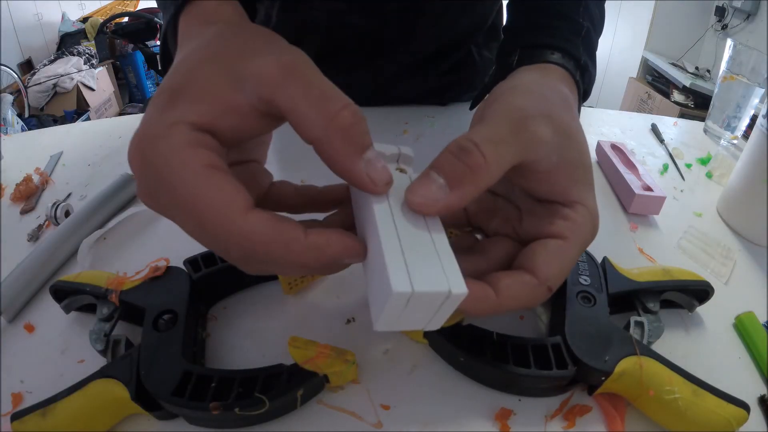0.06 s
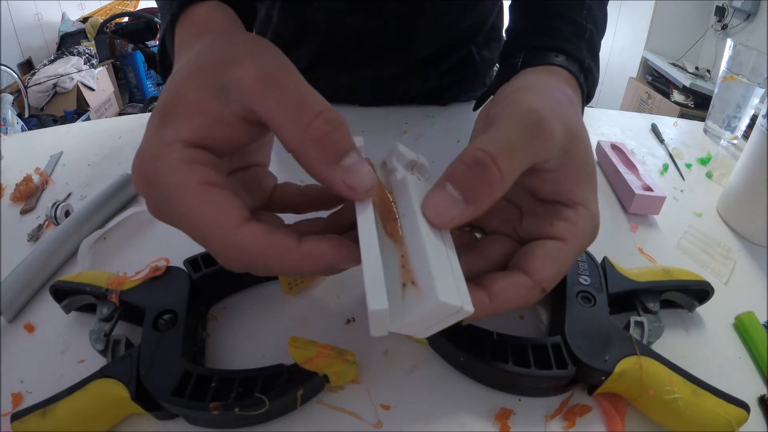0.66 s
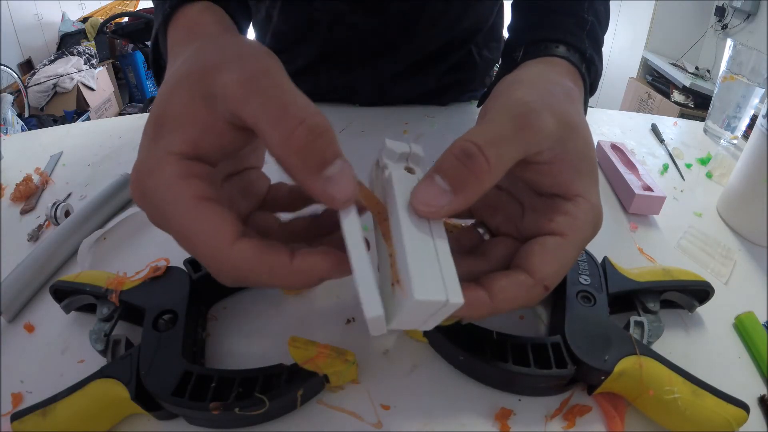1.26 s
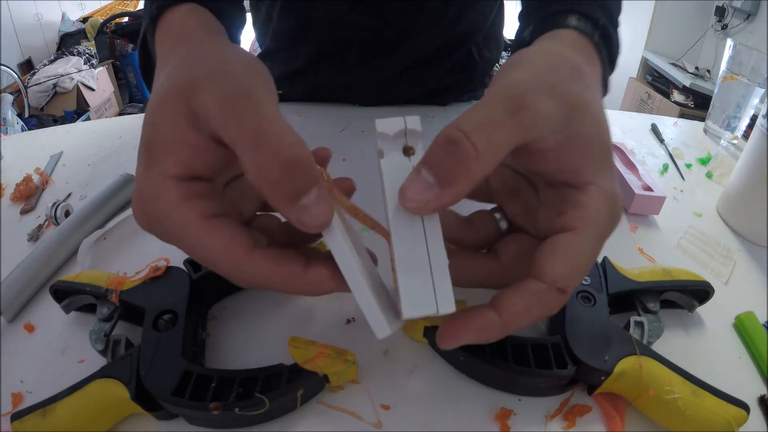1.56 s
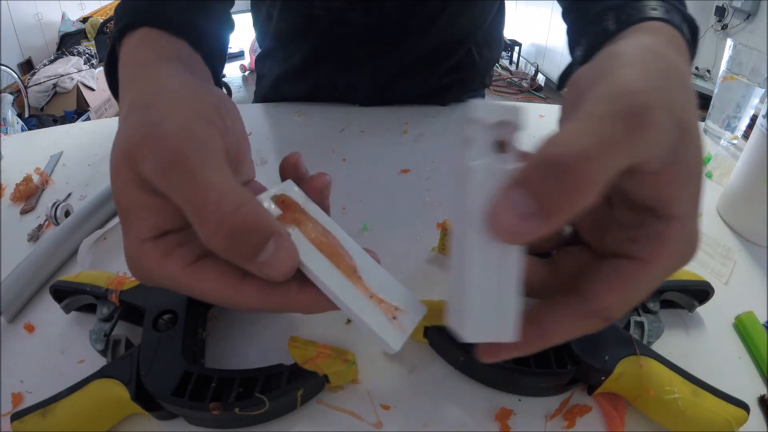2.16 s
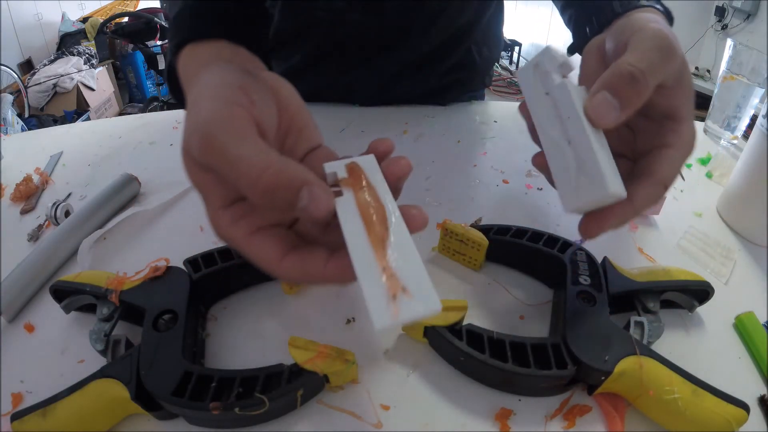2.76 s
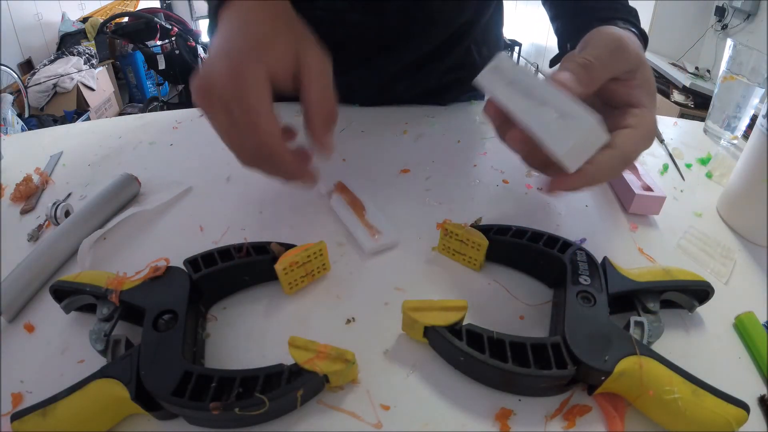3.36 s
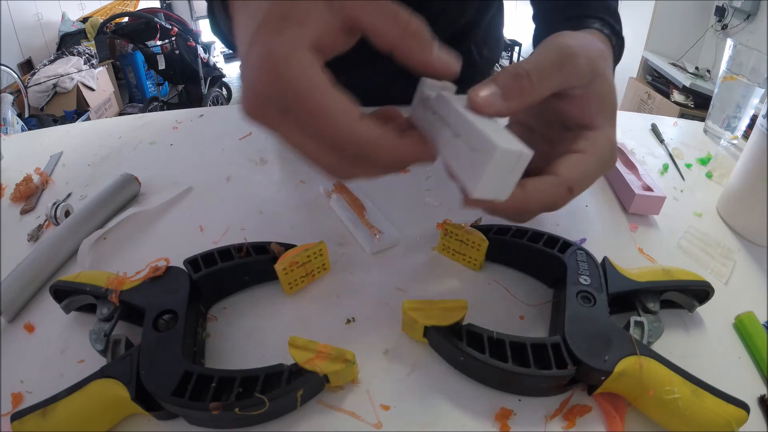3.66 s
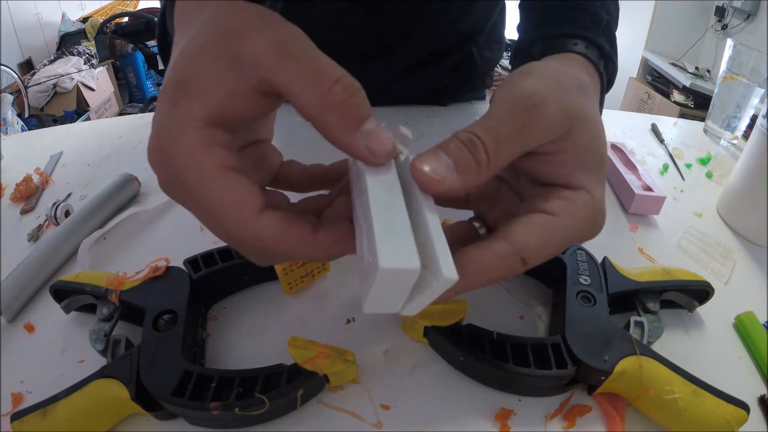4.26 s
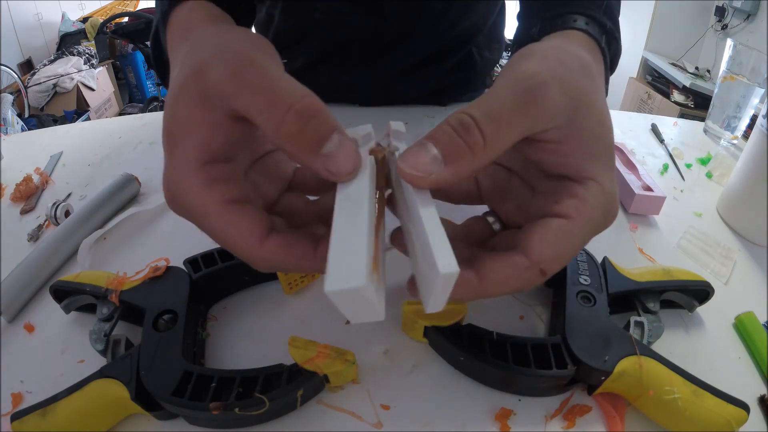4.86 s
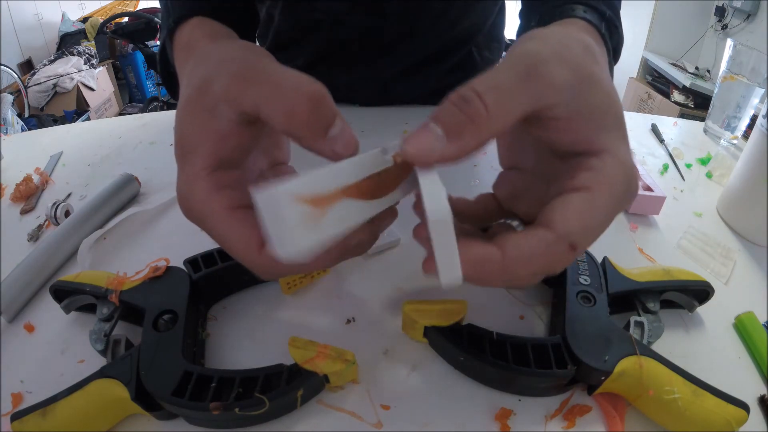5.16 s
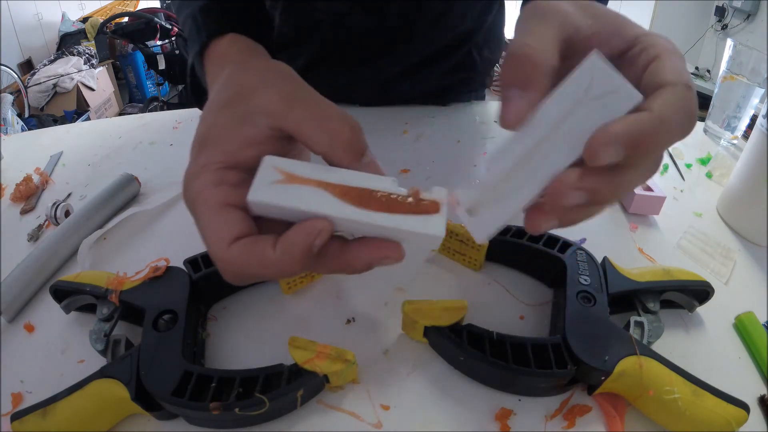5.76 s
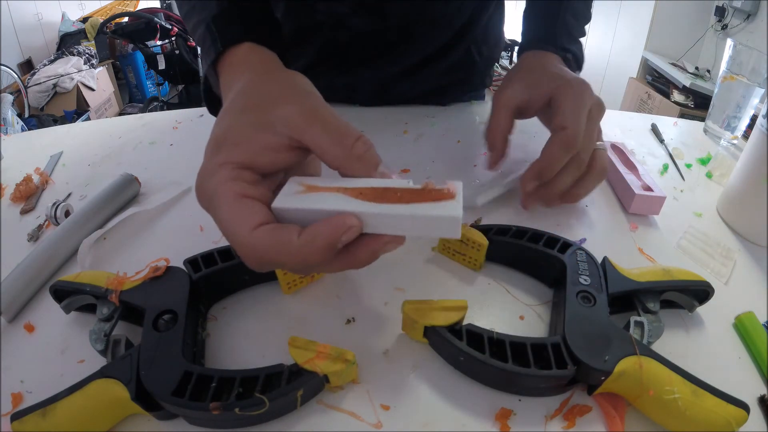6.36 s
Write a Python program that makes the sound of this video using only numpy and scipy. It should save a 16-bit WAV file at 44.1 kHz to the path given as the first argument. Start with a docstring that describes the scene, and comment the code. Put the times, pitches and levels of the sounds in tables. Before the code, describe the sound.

In a small room with soft hum and hiss, two halves of a plastic mould tap faintly as they are pulled apart by hand. The thin half is set on a workbench, slides and settles with clicks. After more light taps, the thick half drops and rattles briefly, thudding in the bench. Four dull knocks from something unseen are spaced through it. The microphone picks up little deep bass.

```python
"""Plastic mould halves on a workbench

In a small room, two halves of a plastic mould tap lightly as they are pulled apart by hand.
The thin half is set down, slides and settles; later the thick half drops among spring clamps and
rattles. Each landing rings the plastic and thuds in the bench. Something out of sight gives dull
knocks in two alternating tones, over soft hum and hiss, a fading rumble and two faint chirps."""
import sys
import numpy as np
from scipy import signal
from scipy.fft import rfft, irfft
from scipy.io import wavfile

SR = 44100
rng = np.random.default_rng(int(sys.argv[2]) if len(sys.argv) > 2 else 0)


def dump(signal):
    """Clip the signal to [-1, 1] and save it as 16-bit WAV at the path in sys.argv[1]."""
    limited = np.clip(np.atleast_2d(signal).T, -1, 1)
    pcm = np.round(limited * 32767).astype(np.int16)
    wavfile.write(sys.argv[1], SR, pcm)


N = 286650   # 6.5 seconds
TIME = np.arange(N) / SR


def from_db(db):
    """Turn decibels into a gain: 0 dB changes nothing, -20 dB gives a tenth."""
    return 10 ** (np.asarray(db) / 20)


def fade(t, ring_s):
    """A fade that falls by 60 dB in ring_s seconds."""
    return from_db(-60 * t / ring_s)


def rms_one(x):
    """Scale a sound so that its average level (rms) is 1."""
    return x / np.sqrt(np.mean(x ** 2) + 1e-20)


def add(out, start_s, sound):
    """Mix a sound into out at the given time."""
    at = round(start_s * SR)
    out[at:at + len(sound)] += sound[:N - at]


def butter(x, hz, kind, order=2):
    """A filter that keeps the lows, the highs or a band in between."""
    return signal.sosfilt(signal.butter(order, hz, kind, fs=SR, output="sos"), x)


def coloured_noise(spectrum):
    """Steady noise at rms 1, with its lows and highs shaped by a table."""
    hz, db = np.transpose(spectrum)
    bins_hz = np.maximum(np.fft.rfftfreq(N, 1 / SR), 1)
    gains = from_db(np.interp(np.log(bins_hz), np.log(hz), db))
    return rms_one(irfft(rfft(rng.standard_normal(N)) * gains, N))


def room(x, echo_db, ring_s, wall_hz):
    """The direct sound plus a weak, duller echo from the walls."""
    t = TIME[:SR]
    tail = rng.standard_normal(SR) * fade(t, ring_s)
    tail *= np.clip(t / 0.013, 0, 1) ** 2   # reflections take a moment to gather
    tail = butter(tail / np.linalg.norm(tail), wall_hz, "low")
    return x + from_db(echo_db) * signal.fftconvolve(x, tail)[:N]


def small_microphone(x, leak_db, low_cut_hz=140):
    """A small microphone lets only a little of a blow's deep bass leak through."""
    low_cut = signal.butter(7, low_cut_hz, "high", fs=SR, output="sos")
    passed = signal.sosfiltfilt(low_cut, x, padtype="constant")
    return passed + from_db(leak_db) * (x - passed)


# The room's hum and hiss, from low to high. Columns: pitch_hz, relative_db
HUM_AND_HISS = [(30, -33.5), (100, -39), (125, -10), (155, 2), (230, -5.5), (450, -14), (1000, -19.5),
                (2500, -26.5), (4200, -38), (5800, -36.5), (6700, -27), (9000, -28.5), (12000, -37),
                (15500, -40.5)]
# The rumble, from low to high. Columns: pitch_hz, relative_db
RUMBLE_SHAPE = [(12, -23.5), (30, 1.5), (48, -6.5), (75, -5.5), (130, -10.5), (400, -30), (1500, -36),
                (4000, -71)]
def background(hum_db=-53, rumble_db=-47.5, fall_db_per_s=15, rest_db=-77.5):
    """Steady hum and hiss, and a low rumble that dies down to a faint resting level."""
    hum = from_db(hum_db) * coloured_noise(HUM_AND_HISS)
    rumble_gain = from_db(rumble_db - fall_db_per_s * TIME) + from_db(rest_db)
    return hum + rumble_gain * coloured_noise(RUMBLE_SHAPE)


# Faint chirps far away. Columns: start_s, length_s, start_hz, end_hz, level_db
FAR_CHIRPS = [(4.82, 0.085, 3800, 3280, -67), (5.528, 0.043, 3500, 3080, -65.5)]
def chirps():
    """Thin whistles that glide down, fading in and out."""
    out = np.zeros(N)
    for start_s, length_s, start_hz, end_hz, level_db in FAR_CHIRPS:
        hz = np.linspace(start_hz, end_hz, round(length_s * SR))
        whistle = np.sin(2 * np.pi * np.cumsum(hz) / SR)
        swell = np.sqrt(np.hanning(len(hz)))
        add(out, start_s, from_db(level_db) * swell * whistle)
    return out


def knock(tones, swell_s, lead_s_per_hz, dull_hz):
    """A cushioned knock: its tones swell quickly, peak about 0.05 s in, then ring out."""
    t = TIME[:SR // 4] - 0.05
    out = 0
    for hz, db, ring_s in tones:
        age = t + lead_s_per_hz * hz   # higher bending waves arrive sooner
        shape = fade(np.abs(age), np.where(age < 0, swell_s, ring_s))
        out += from_db(db) * shape * np.cos(2 * np.pi * hz * age)
    return signal.sosfiltfilt(signal.butter(6, dull_hz, fs=SR, output="sos"), out)


# The tones of the unseen thing that knocks. Columns: pitch_hz, deep_db, bright_db, ring_s
KNOCK_TONES = [(150.4, 8, 11.5, 0.038), (207.5, -28, -10, 0.094), (311, -1, -20.5, 0.047),
               (372.5, -3.5, 0.5, 0.038), (596, -22.5, -11.5, 0.083), (683, -11.5, -10, 0.045),
               (886, -17, -7.5, 0.014), (1127, -20, -16, 0.04), (1278, -4, -6.5, 0.0069),
               (1360, -23, -29, 0.18), (1560, -18, -4.5, 0.015), (1840, -24.5, -11.5, 0.0065)]
# When it knocks. Columns: peak_s, gain_db
KNOCK_TIMES = [(1.2316, -23), (2.5733, -26), (4.2234, -22), (5.4447, -27)]
def knocks():
    """Deep and bright knocks take turns, like a valve that opens and closes."""
    hz, deep_db, bright_db, ring_s = np.transpose(KNOCK_TONES)
    deep = knock(zip(hz, deep_db, ring_s), swell_s=0.025, lead_s_per_hz=1.1e-6, dull_hz=2000)
    bright = knock(zip(hz, bright_db, ring_s), swell_s=0.02, lead_s_per_hz=1.3e-6, dull_hz=2260)
    out = np.zeros(N)
    for k, (peak_s, gain_db) in enumerate(KNOCK_TIMES):
        add(out, peak_s - 0.05, from_db(gain_db) * (bright if k % 2 else deep))
    return out


# Pitch ranges of the bench's thud and of the plastic's clack (body), click (rim) and snap (edge).
BENCH_HZ, BODY_HZ, RIM_HZ, EDGE_HZ = (110, 650), (720, 3700), (3900, 6200), (6400, 10300)
def ring(force, tones, band):
    """A push rings an object's own tones in one pitch range; their strength varies by spot touched."""
    in_band = [tone for tone in tones if band[0] <= tone[0] < band[1]]
    out = 0
    for k, (hz, db, ring_s) in enumerate(in_band):
        decay, angle = fade(1 / SR, ring_s), 2 * np.pi * hz / SR   # both per sample
        strength = (-1) ** k * from_db(db + rng.standard_normal())
        feedback = [1, -2 * decay * np.cos(angle), decay ** 2]
        out += strength * signal.lfilter([0, np.sin(angle)], feedback, force)
    return out


def strike(tones, band, crack_db, crack_s):
    """One blow: ringing tones plus a short noisy crack, at rms 1 over the first 10 ms."""
    t, head = TIME[:SR // 4], SR // 100
    crack_fade = fade(t, crack_s)
    scuff = rng.standard_normal(len(t)) * crack_fade / 80   # rough edges rub
    ringing = ring(signal.unit_impulse(len(t)) + scuff, tones, band)
    crack = butter(rng.standard_normal(len(t)) * crack_fade, band, "band", order=3)
    blow = ringing / np.std(ringing[:head]) + from_db(crack_db) * crack / np.std(crack[:head])
    blow *= 1 - np.exp(-t / 0.00029)   # the contact takes a moment to close
    return blow / np.std(blow[:head])


# Light taps of the halves while still in the hands. Columns: start_s, level_db, hardness_db
HAND_TAPS = [(2.046, -52.5, -4), (5.0192, -56.5, -8), (5.7002, -45, -5), (5.7078, -42, -7),
             (5.732, -46, -21), (5.740, -42.5, -25), (5.81, -50.5, -22), (5.891, -49.5, -30)]
# The tones of a half held in the fingers. Columns: pitch_hz, relative_db, ring_s
HELD_TONES = [(847, 5, 0.013), (1148, -1.5, 0.052), (1300, 0, .025), (1860, -12, .015), (2760, -4.5, 0.021),
              (4695, 11, 0.023), (5300, -3, 0.02)]
def held_taps():
    """Taps cut short by the fingers; a harder tap has more click."""
    out = np.zeros(N)
    for start_s, db, hardness_db in HAND_TAPS:
        clack = from_db(db) * strike(HELD_TONES, BODY_HZ, crack_db=-10, crack_s=0.047)
        click = from_db(db + hardness_db) * strike(HELD_TONES, RIM_HZ, crack_db=-9, crack_s=0.019)
        add(out, start_s, clack + click)
    return out


def sizzle():
    """The brief, very high hiss of a hard edge making contact."""
    t = TIME[:SR // 4]
    return butter(rng.standard_normal(len(t)), 10000, "high") * fade(t, ring_s=0.022)


# The tones of the workbench, when hit or slid on. Columns: pitch_hz, relative_db, ring_s
BENCH_TONES = [(151.3, 4.5, 0.064), (195, 4, 0.019), (311, -2.5, 0.046), (376.5, -6, 0.039),
               (481, -15, 0.087), (635, -24, 0.064)]
def landings(hits, tones, body_crack_db, rim_crack_db, edge_crack_db):
    """Each hit thuds in the bench and rings the half; harder hits are brighter and crack more."""
    out = np.zeros(N)
    for start_s, db, hardness_db, thud_db in hits:
        edge_db = db - 8.5 + 1.21 * hardness_db
        harsh_db = 0.21 * hardness_db
        thud = from_db(db + thud_db) * strike(BENCH_TONES, BENCH_HZ, crack_db=-13.5, crack_s=0.071)
        clack = from_db(db) * strike(tones, BODY_HZ, body_crack_db + harsh_db, crack_s=0.031)
        click = from_db(db + hardness_db) * strike(tones, RIM_HZ, rim_crack_db, crack_s=0.021)
        snap = from_db(edge_db) * strike(tones, EDGE_HZ, edge_crack_db + harsh_db, crack_s=0.013)
        hiss = from_db(edge_db - 6) * sizzle()
        add(out, start_s, thud + clack + click + snap + hiss)
    return out


def sliding(slides, tones, bench_db, rim_db, edge_db):
    """Sliding plastic catches in many tiny jerks, which ring both the bench and the half."""
    catches_per_s, rise_s, fall_db_per_s = 900, 0.065, 126.5
    catches = (rng.random(N) < catches_per_s / SR) * rng.standard_normal(N) + 1e-18
    scrape = from_db(bench_db) * rms_one(ring(catches, BENCH_TONES, BENCH_HZ))
    for band, db in ((BODY_HZ, 0), (RIM_HZ, rim_db), (EDGE_HZ, edge_db)):
        scrape += from_db(db) * rms_one(ring(catches, tones, band))
    gain = np.zeros(N)
    for start_s, length_s, db in slides:   # each builds up, then dies as the half comes to rest
        rise = np.clip((TIME - start_s) / rise_s, 0, 1)
        past_end_s = np.maximum(TIME - start_s - length_s, 0)
        gain += rise * from_db(db - fall_db_per_s * past_end_s)
    return gain * scrape


# The thin half meets the bench. Columns: start_s, level_db, hardness_db, thud_offset_db
THIN_LANDINGS = [(3.1127, -23.5, -11.5, -4), (3.1382, -35.5, -13, -2), (3.1668, -33, -6, -5),
                 (3.1807, -34.5, -5.5, -2), (3.303, -28.5, 5.5, 1.5), (3.3192, -34, 7.5, 0),
                 (3.3455, -32.5, -1, -2.5), (3.3842, -40.5, -2.5, -9)]
# Its slides. Columns: start_s, length_s, level_db
THIN_SCRAPES = [(3.125, 0.14, -48), (3.34, 0.055, -52.5)]
# The tones it rings with. Columns: pitch_hz, relative_db, ring_s
THIN_TONES = [(894, 4.5, 0.045), (1167, 2, 0.041), (1500, 8, 0.016), (1883, -4.5, 0.041),
              (2190, -6.5, 0.038), (2847, -2.5, 0.031), (3370, -40, 0.022), (4140, -4.5, .02),
              (4480, -4, 0.0051), (4800, 6.5, 0.015), (5400, -1, 0.025), (5710, -3.5, 0.038),
              (5800, -29, 0.03), (6600, -14, 0.028), (7150, -7.5, 0.026), (8560, -6, 0.022),
              (10200, -16, 0.028)]
def thin_half():
    """The thin half is set down, slides, tips flat and bounces."""
    hits = landings(THIN_LANDINGS, THIN_TONES, body_crack_db=-0.5, rim_crack_db=-3.5, edge_crack_db=-4.5)
    return hits + sliding(THIN_SCRAPES, THIN_TONES, bench_db=5, rim_db=-19.5, edge_db=-22)


# The thick half drops and rattles. Columns: start_s, level_db, hardness_db, thud_offset_db
THICK_LANDINGS = [(6.2375, -20.5, -10.5, -0.5), (6.2478, -25.5, -25, -3.5), (6.3055, -21, 7.5, 5),
                  (6.3087, -37, 19, -27), (6.352, -31.5, -1.5, 4.5), (6.3638, -26, -4.5, -14),
                  (6.394, -47, 2, -8), (6.4053, -31.5, 10, -2), (6.425, -36.5, -11, 0.5),
                  (6.4508, -32.5, -24, 8.5), (6.4662, -48.5, 12, 4), (6.48, -44, 8.5, -13)]
# Its slide. Columns: start_s, length_s, level_db
THICK_SCRAPES = [(6.31, 0.14, -38.5)]
# The tones it rings with. Columns: pitch_hz, relative_db, ring_s
THICK_TONES = [(908, 0, 0.027), (1123, -0.5, 0.046), (1209, 4.5, 0.044), (1560, -2, 0.024),
               (2186, -2.5, 0.024), (2320, -39, 0.083), (2845, -3.5, 0.041), (3200, -23, 0.048),
               (3380, -18, 0.055), (4805, 1.5, 0.016), (4955, -7, 0.021), (5170, -0.5, 0.059),
               (5485, 6, 0.029), (5590, -4, 0.056), (5730, -5, 0.051), (7150, 13, 0.031), (7970, 6, 0.028),
               (8700, 1, 0.032), (8900, -2, 0.068), (9770, -2.5, 0.05)]
def thick_half():
    """The thick half drops among the clamps, sliding as it rattles."""
    hits = landings(THICK_LANDINGS, THICK_TONES, body_crack_db=-4, rim_crack_db=-11, edge_crack_db=-3.5)
    return hits + sliding(THICK_SCRAPES, THICK_TONES, bench_db=7, rim_db=-5.5, edge_db=-10)


def scene():
    """The plastic and the knocks echo in the room, over the chirps and background, in one channel."""
    plastic = thin_half() + thick_half() + held_taps()
    plastic = butter(plastic, 11300, "low")   # plastic contacts are soft in the highest treble
    plastic = room(plastic, echo_db=-14.5, ring_s=0.42, wall_hz=5550)
    knocking = room(knocks(), echo_db=-14, ring_s=0.54, wall_hz=3000)
    blows = small_microphone(plastic, leak_db=-27.5) + small_microphone(knocking, leak_db=-34)
    return (blows + chirps() + background())[None]


def record(dry, cutoff_hz=15600):
    """Round off the loudest peaks and steeply cut the highest treble."""
    treble_cut = signal.ellip(10, .1, 80, cutoff_hz, fs=SR, output="sos")
    return signal.sosfilt(treble_cut, np.tanh(dry))


dry = scene()
out = record(dry)
dump(out)
```